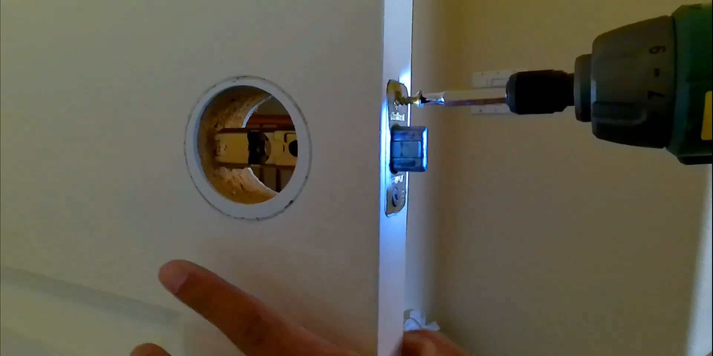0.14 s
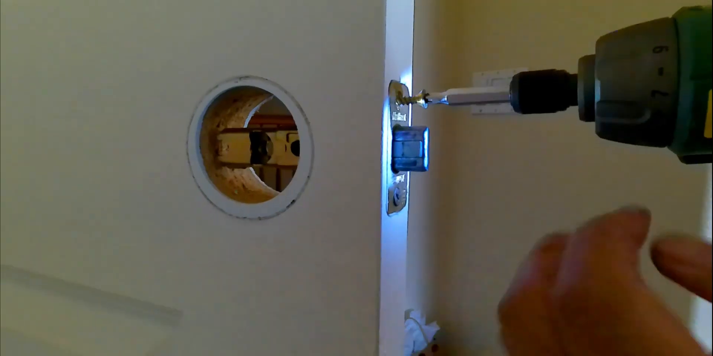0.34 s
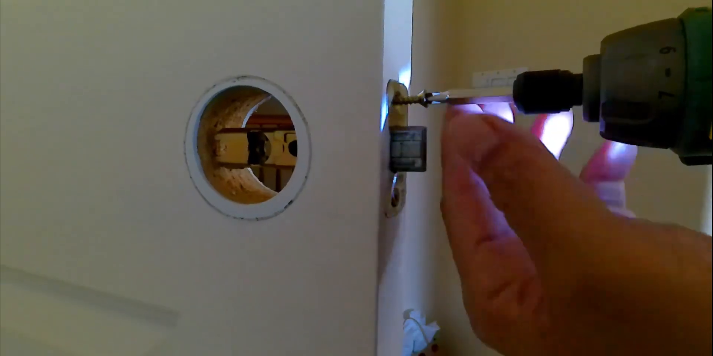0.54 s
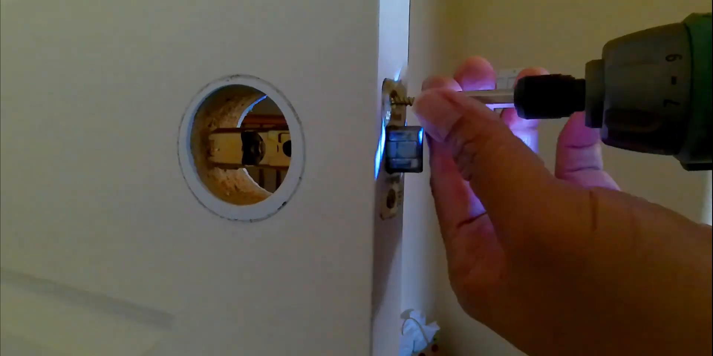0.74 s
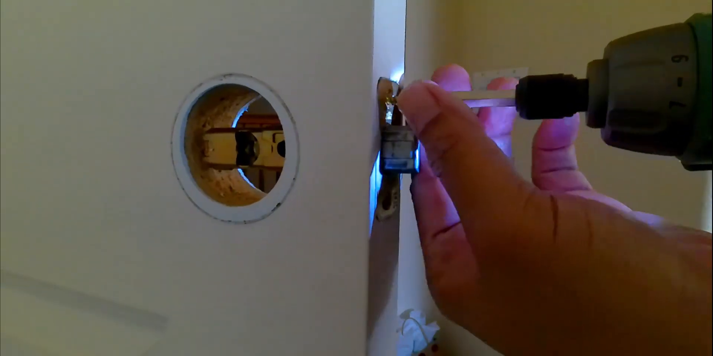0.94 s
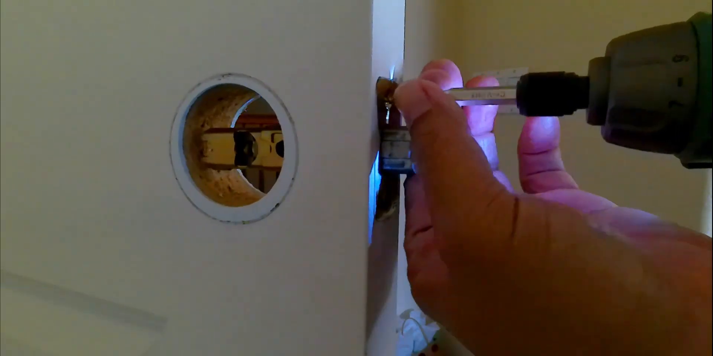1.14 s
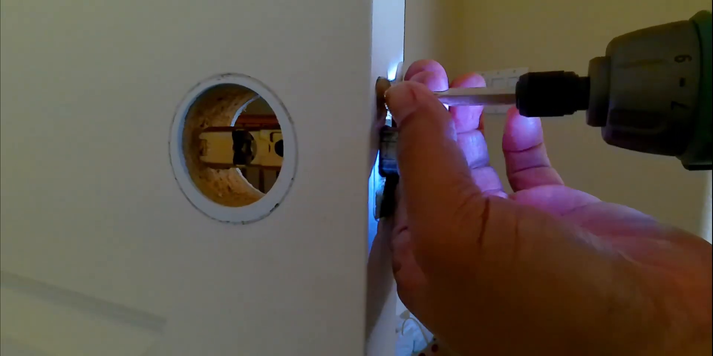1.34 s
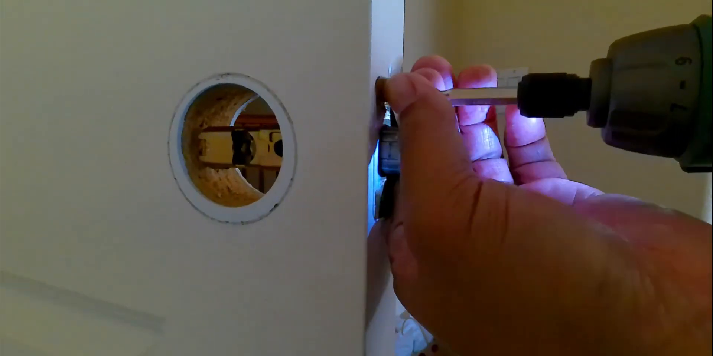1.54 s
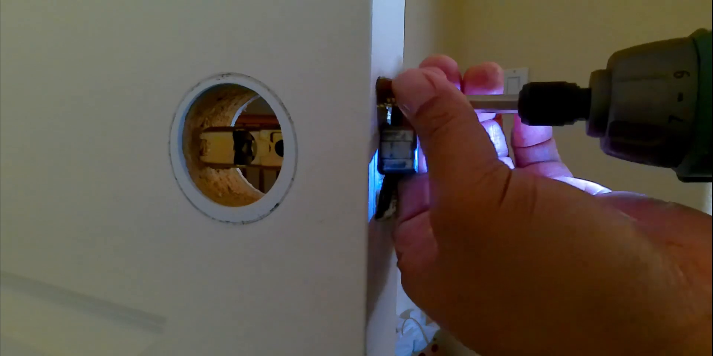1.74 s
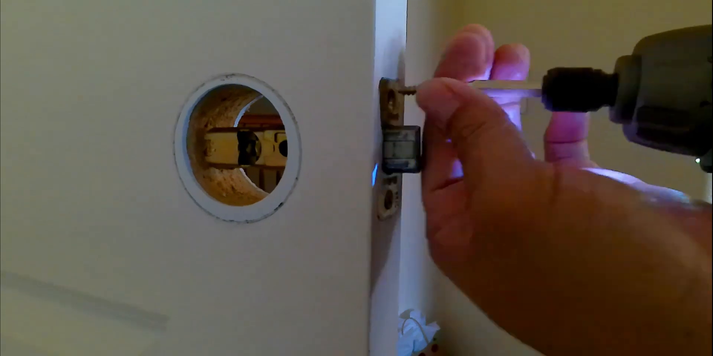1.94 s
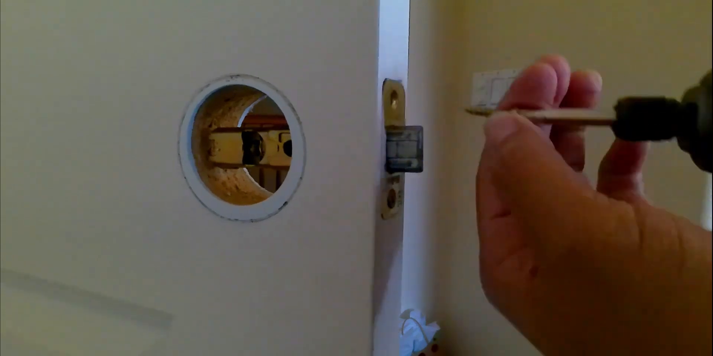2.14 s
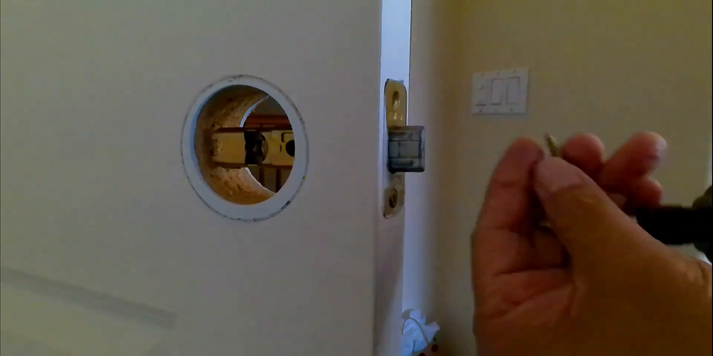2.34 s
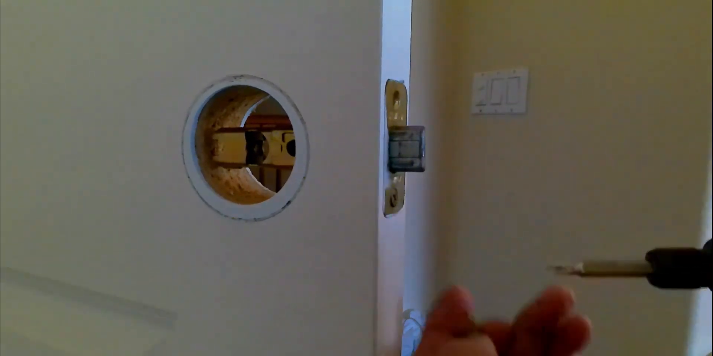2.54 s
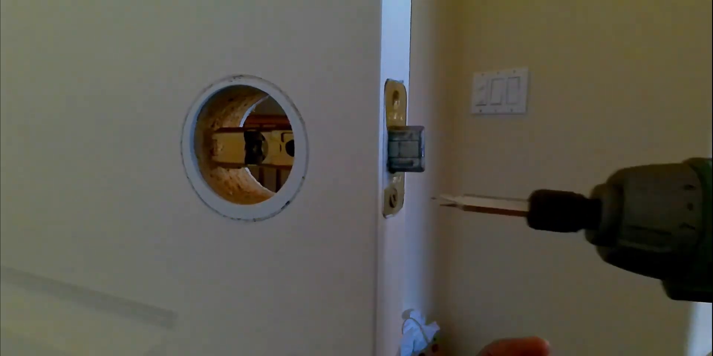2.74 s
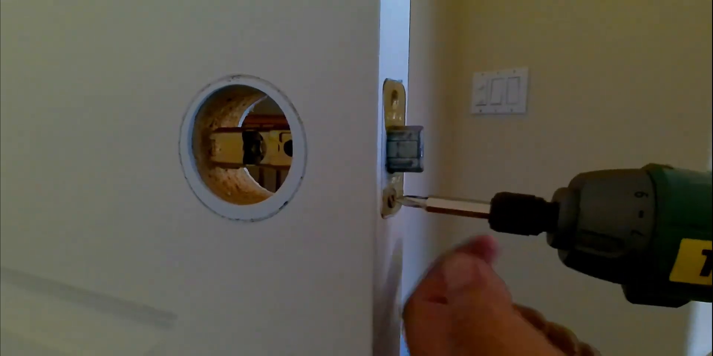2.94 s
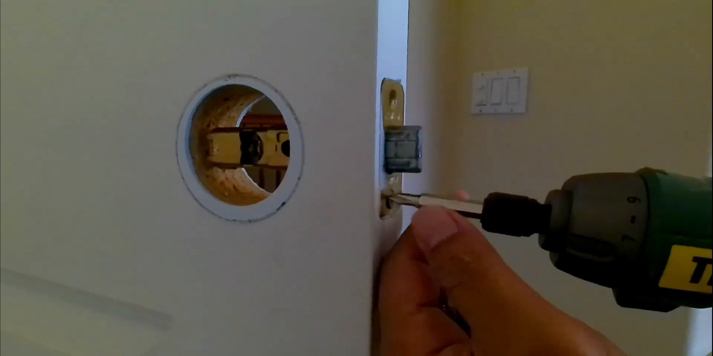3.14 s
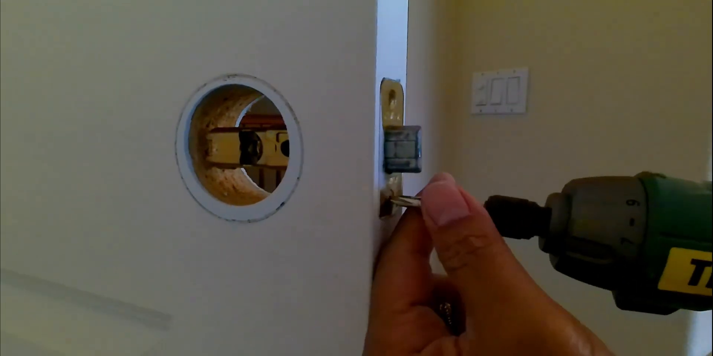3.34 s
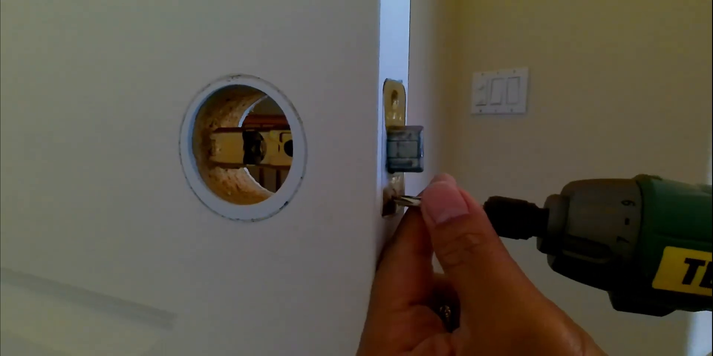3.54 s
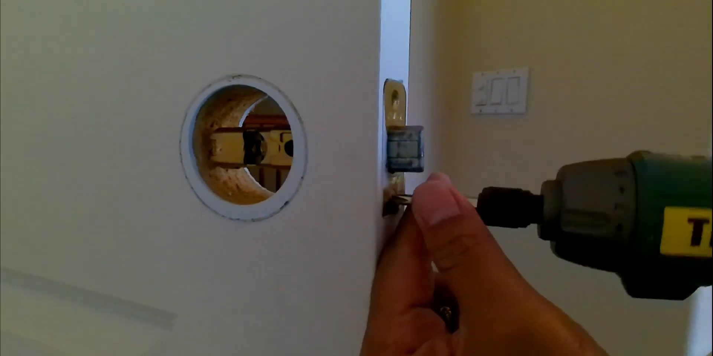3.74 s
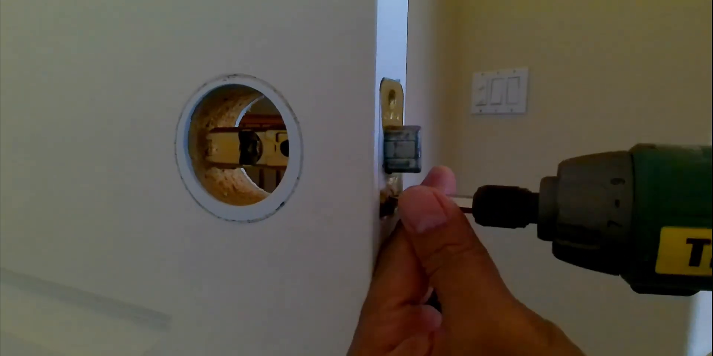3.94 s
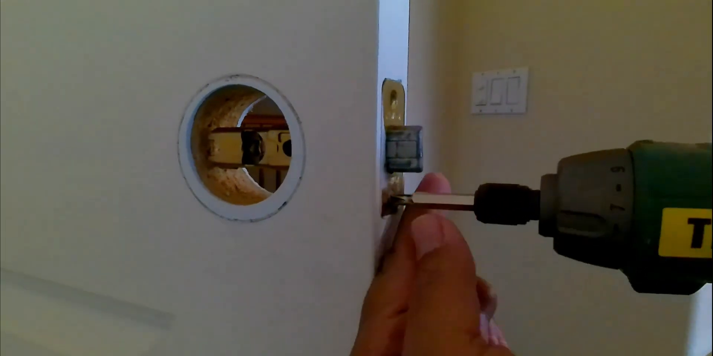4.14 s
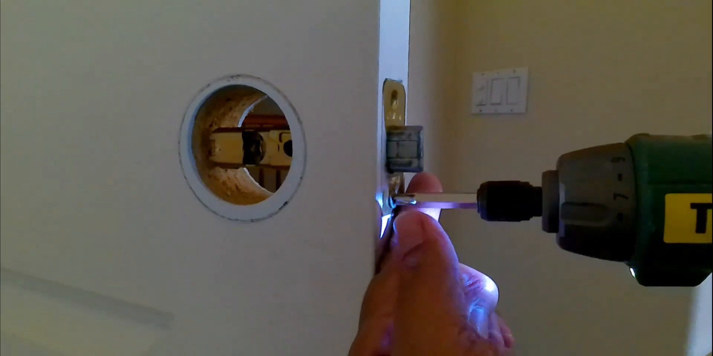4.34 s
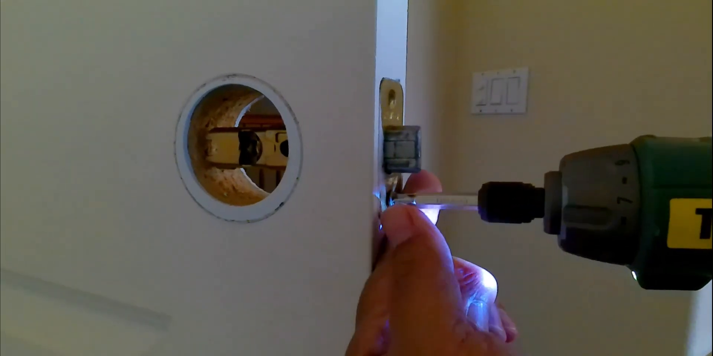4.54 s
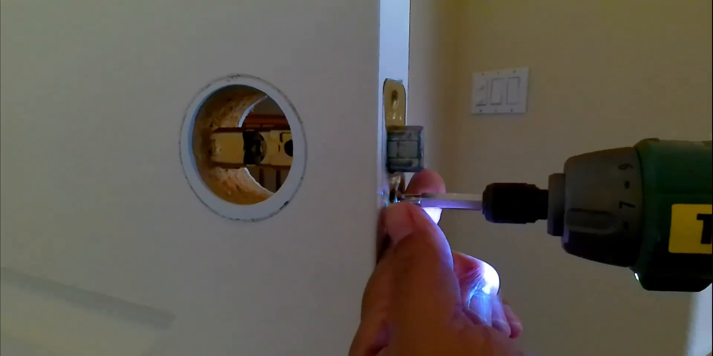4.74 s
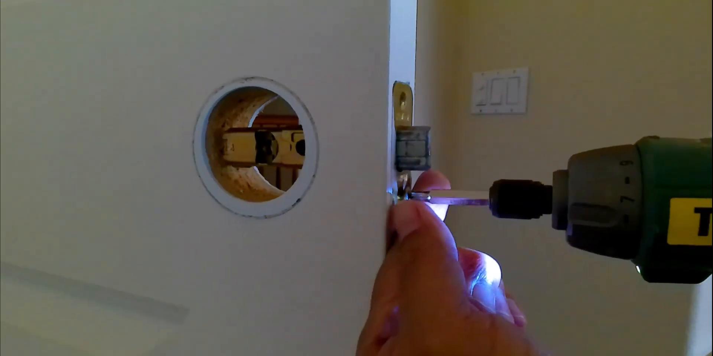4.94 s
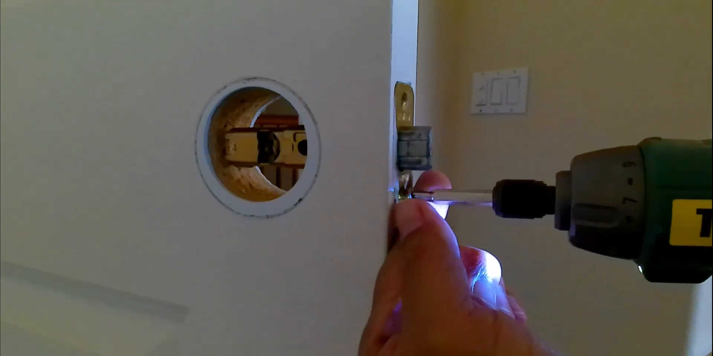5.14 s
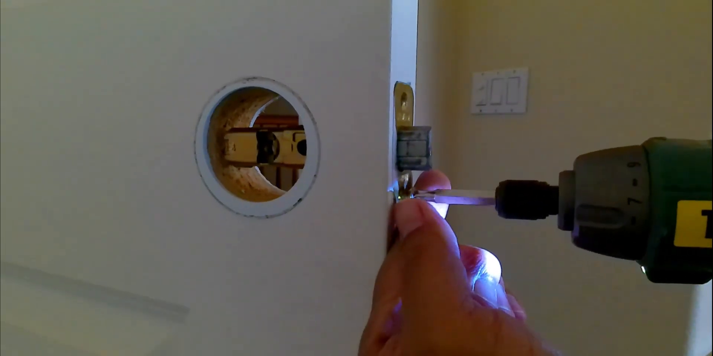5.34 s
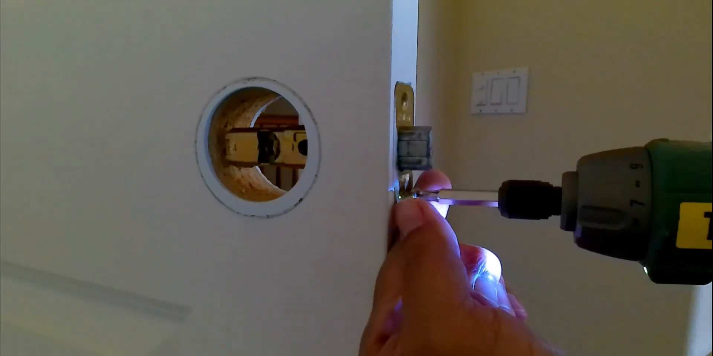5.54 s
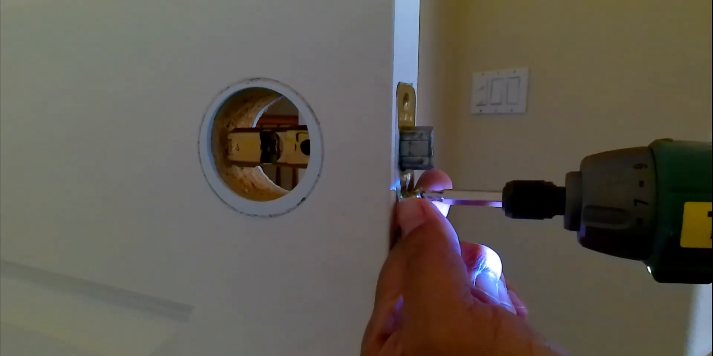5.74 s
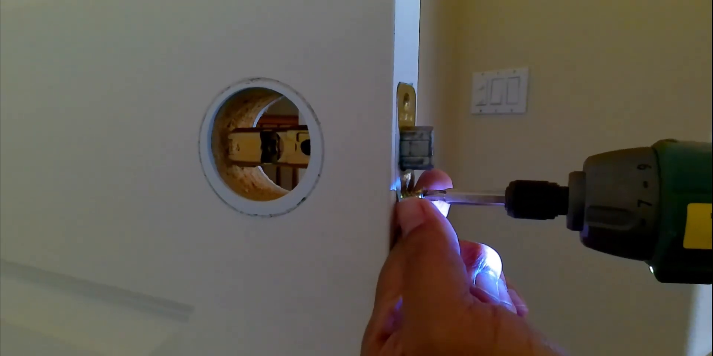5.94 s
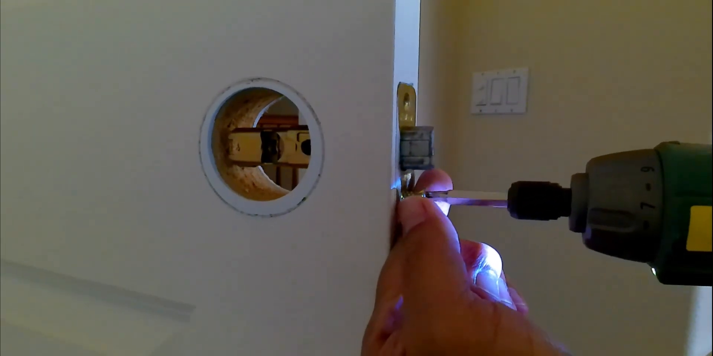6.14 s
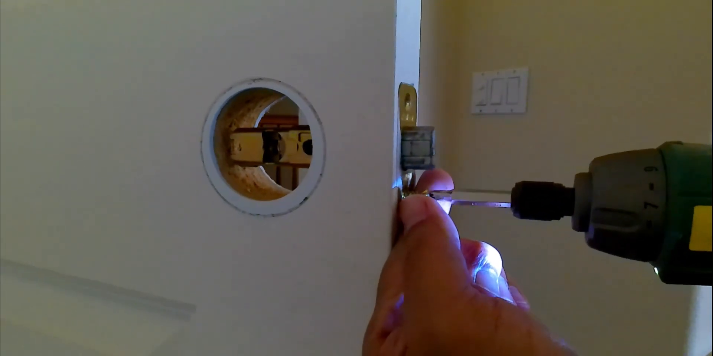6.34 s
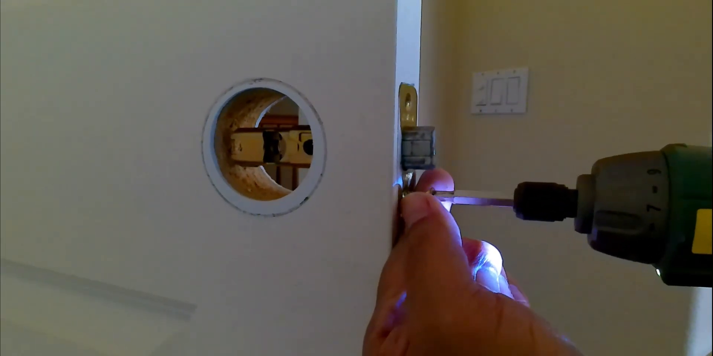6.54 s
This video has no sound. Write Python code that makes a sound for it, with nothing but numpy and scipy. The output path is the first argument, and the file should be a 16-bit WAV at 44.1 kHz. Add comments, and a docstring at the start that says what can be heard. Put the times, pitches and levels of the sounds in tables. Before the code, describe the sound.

A cordless drill-driver is heard close up in a small room with a short reverberation. From 0 seconds it is already at full speed: a dense, gritty whir of rattling gears, bright metallic chatter, airy fan noise and a thin whine, nearly steady in pitch and easing slightly in level. At about 2.0 it is released; the whir slides down in pitch and softens, stopping by 2.5 with a slight catch near the end. Quiet room tone and soft hiss follow. A faint tick comes near 2.95, then a clearer click and woody bump at 3.05, with small taps and ticks around 3.25, 3.5, 3.6, 3.8 and 3.9. At about 4.2 a trigger clack and quick, jolting judder launch the drill again. It starts a little lower and rougher under load, rises slightly until about 5.3, then runs steadily to an abrupt end around 6.7.

```python
"""Drill-driver at a door edge

A cordless drill-driver backs two screws out of a door edge, close to the microphone in a small room.
Gear-tooth blows and brush scratch ring its case and steel parts; whine lines follow the shaft speed.
Already running, it is let go and coasts to a stop; in the pause filtered noise bursts knock and tick.
Then it starts again with a jolt and judder and runs to the end, over shaped noise for air and hiss."""
import sys
import numpy as np
from scipy import signal
from scipy.fft import rfft, irfft, next_fast_len
from scipy.io import wavfile
from scipy.ndimage import uniform_filter1d, map_coordinates

SR = 44100
rng = np.random.default_rng(int(sys.argv[2]) if len(sys.argv) > 2 else 0)


def materialize(psi):
    """Save the field psi as 16-bit PCM at rate SR to the path in sys.argv[1].

    A 1-D psi becomes a single channel; in a 2-D psi each row is a channel.
    """
    bounded = np.clip(np.atleast_2d(psi).T, -1, 1)
    quanta = np.round(bounded * 32767).astype(np.int16)
    wavfile.write(sys.argv[1], SR, quanta)


N = 294588

# multiples of the planet rate: tooth mesh, mesh less one motor turn, motor shaft
TEETH, SIDEBAND, GEARING = 16, 13, 3
# a tight screw drags the speed down: free planet turns per s, and the scale of the sag that loads the drill
FREE_RATE, LOAD_SAG = 76.6, 1.3
LOAD_RATTLE_DB, LOAD_CHATTER_DB = 1.8, 1.5  # added to rattle and metallic chatter as load nears full
COAST_RATTLE_DB, COAST_CHATTER_DB = -9.5, -22  # change towards standstill; chatter also during spin-up
UNPOWERED_DB, CUT_S = -0.5, 0.02  # rattle and whine drop over this time when the trigger is let go
SPIN_UP_S, SETTLE_S = 0.027, 0.072  # time constant of spin-up; the last teeth come to rest

# speed under power, one curve per screw, before a slight random drift: t/s, planet gear turns per s
SPEED = [
    [(0, 75.65), (.2, 75.9), (.42, 76.3), (.54, 76.15), (.68, 76.7), (1.1, 76.45), (1.4, 76.7),
     (1.72, 76.5), (2.04, 76.7)],
    [(4.33, 71), (4.39, 72.3), (4.46, 73), (4.76, 74.6), (5.02, 75.72), (5.36, 76.45), (5.5, 76.2),
     (5.66, 76.5), (5.85, 76.4), (6.3, 76.72)],
]
# the gearbox lurches as the bit bites or slips, or as slowing teeth part and catch: t/s, level/dB, width/s
LURCHES = [(1.36, -3, .02), (2.30, 2.5, 0.022), (2.413, -8, 0.0084), (4.277, 5.5, .022), (4.45, 2, .03),
           (5.17, -1, .05), (5.42, 1.5, .035)]
# spectrum of the plastic gear case: f/Hz, relative level/dB per Hz on the first screw, on the second
CASE = [(90, -21, -34), (162, -28.5, -21.5), (410, -14, -11), (595, -14.5, -13.5), (840, -11, -10.5),
        (1014, -4, -4.5), (1200, -3, 1), (1630, -2, -5), (2010, -2.5, -2.5), (2270, -6.5, -8),
        (2680, -3, -4), (3106, -16, -17.5), (3380, -15, -15.5), (5700, -70, -68)]
# spectrum of the steel gears and chuck: f/Hz, relative level/dB per Hz on the first screw, on the second
STEEL = [(2020, -48.5, -27), (3090, -28, -13.5), (3710, -6, -5.5), (3940, -9, -10), (4180, -1, 1.5),
         (4560, -3, -4), (4830, 3, -1), (5320, -1.5, 2), (5830, -8.5, -6), (7370, -17, -19),
         (8230, -11.5, -11), (10800, -21.5, -18.5), (12000, -35, -28), (15000, -39, -45)]
# spectrum of cooling air in the vents: f/Hz, relative level/dB per Hz
FAN = [(300, -30), (3000, -32), (6000, 8), (7200, -7.5), (8300, -3.5), (10500, -8), (12000, -12.5),
       (15000, -12)]


def drill(screw, start, release, stop, rattle_db, chatter_db, fan_db, whine_db, ease_db_per_s):
    """One pull of the trigger: spin-up, noise easing as the screw backs out, coasting down on friction."""
    t = clock()
    running = np.maximum(t - start, 0)
    speed, = curves(SPEED[screw])
    load = np.tanh(np.maximum(FREE_RATE - speed, 0) / LOAD_SAG)
    coast = np.clip((stop - t) / (stop - release), 0, 1)
    spin = coast * (1 - np.exp(-running / SPIN_UP_S))
    turns = np.cumsum(speed * spin * (1 + 0.0005 * wobble(14))) / SR
    moving = np.clip(running / 0.006, 0, 1) * np.clip((stop - t) / SETTLE_S, 0, 1)
    unpowered = np.clip((t - release) / CUT_S, 0, 1)

    # the bit wanders in the screw head, so the noise comes and goes a little
    lurch_db = sum(db * np.exp(-((t - s) / width) ** 2) for s, db, width in LURCHES)
    effort_db = lurch_db - ease_db_per_s * running + 0.4 * wobble(10)
    slowing_db = UNPOWERED_DB * unpowered + COAST_RATTLE_DB * (1 - coast)
    rattle = amp(effort_db + LOAD_RATTLE_DB * load + slowing_db + 0.97 * wobble(30))
    chatter_change_db = LOAD_CHATTER_DB * load + COAST_CHATTER_DB * (1 - spin)
    chatter = amp(effort_db + chatter_change_db + 0.6 * wobble(22))

    def level(x):
        """Scale to rms 1 over the time the motor turns faster than half speed."""
        return x / np.sqrt(np.mean(x[spin > 0.5] ** 2))

    case_body = [(row[0], row[1 + screw]) for row in CASE]
    steel_body = [(row[0], row[1 + screw]) for row in STEEL]
    case_hits = tooth_hits(turns, scatter_db=3, throb_db=3.0, slide=0.52)
    case = ringing(case_hits + 0.042 * brushes(turns), case_body)
    steel_hits = tooth_hits(turns, scatter_db=4.5, throb_db=2.5, slide=0.7)
    steel = ringing(steel_hits + 0.38 * brushes(turns), steel_body)
    # slow, slack teeth strike softly and ring the case mainly around one mode
    slack = filtered(case, lambda f: resonance(f, hz=1290, width=420))
    case = coast * level(case) + (1 - coast) * level(slack)

    gears = amp(rattle_db) * rattle * case + amp(chatter_db) * chatter * level(steel)
    fan = amp(fan_db) * chatter * spin * ringing(rng.standard_normal(N), FAN)
    tones = whine(screw, speed, spin, turns, load, case_body, steel_body)
    # the thin whine fades as the gears slow
    thin_whine = amp(whine_db + UNPOWERED_DB * unpowered) * spin ** 2.2 * tones
    return moving * (room(gears, wet_db=-7.5) + fan + thin_whine)


def tooth_hits(turns, scatter_db, throb_db, slide):
    """A blow per gear tooth, harder once a motor turn and as the planets pass; sliding noise between."""
    def beat(multiple):
        """A cosine at a multiple of the planet rate, from a random phase."""
        return np.cos(2 * np.pi * (multiple * turns + rng.random()))

    throb = beat(GEARING) + 0.9 * beat(TEETH / 9) + 0.6 * beat(2)
    throb = throb + 0.4 * beat(2 * TEETH / 9) + 0.4 * beat(1)
    at = np.flatnonzero(np.diff(np.floor(TEETH * turns + 0.12 * wobble(900))))
    scatter = amp(scatter_db * np.clip(rng.standard_normal(len(at)), -2, 2))
    blows = np.zeros(N)
    blows[at] = rng.choice([-1, 1], len(at)) * scatter
    # even out the power, however fast the teeth follow one another
    blows /= np.sqrt(np.abs(uniform_filter1d(blows ** 2, SR // 10)) + 1e-4)
    return amp(throb_db * throb) * (blows + slide * rng.standard_normal(N))


def brushes(turns, size=192):
    """The brushes scratch over the same worn commutator on every motor turn."""
    place = (GEARING * turns + 0.012 * wobble(60)) * size
    return unit(map_coordinates(rng.standard_normal(size), [place % size], mode="grid-wrap"))


# whine of gears and motor: multiple of the planet rate (rounded when played),
# relative level/dB on the first screw, on the second, level/dB gained towards full load
WHINE = [(3, -59, -54.5, 7), (6, -64.5, -63, 10.5), (9, -60.5, -47, 0.5), (10, -66, -65.5, 13),
         (11, -61.5, -57, 3), (12, -49, -52.5, 5.5), (15, -46.5, -52, 5), (17, -75, -60, 2),
         (18, -65, -55, -11), (19, -46.5, -46, 1), (20, -54, -73, -12), (22, -47.5, -51, -1),
         (23, -49.5, -54, -11), (26, -50.5, -51, -11), (27, -46, -46.5, -4), (29, -49, -50, -19),
         (32, -50.5, -56, 3), (35, -59, -60.5, 7.5), (36, -53.5, -58, -13), (45, -60.5, -56.5, 3),
         (48, -55, -50, -15), (51, -59, -60, -15), (54, -56, -55, -15), (64.1, -50, -54, 4),
         (67.1, -61, -55, 4), (86, -79, -63, 11), (124, -78, -60.5, -5)]
# gear mesh tone, swelling and dropping out as the speed creeps up, one curve per screw:
# t/s, relative level/dB
MESH_LEVEL = [
    [(0, -40.5), (.6, -38), (.9, -43), (1.8, -44.5), (2.04, -45)],
    [(4.33, -36), (4.42, -35), (4.57, -34), (4.65, -63), (4.75, -50), (4.86, -33.5), (4.95, -41),
     (5.5, -43.5), (6.3, -38.5)],
]
# lower sideband of the mesh tone, one curve per screw: t/s, relative level/dB
SIDEBAND_LEVEL = [
    [(0, -45), (.65, -42), (1.15, -49.5), (2.04, -53)],
    [(4.36, -38.5), (4.5, -49), (4.86, -48.5), (5.3, -41), (6.68, -42)],
]


def whine(screw, speed, spin, turns, load, case, steel, mesh_gain_db=0.47, ring_db=10):
    """Gear mesh tone, its sideband and multiples of the planet rate; load shifts their balance."""
    mesh_db, = curves(MESH_LEVEL[screw])
    sideband_db, = curves(SIDEBAND_LEVEL[screw])
    rates = np.linspace(0, np.max(speed), 300)

    def line(multiple, waver_db, blur):
        """A gliding line swells and fades as it crosses the drill's resonances, one of them sharp."""
        f = round(multiple) * rates
        sharp_db = ring_db * np.abs(resonance(f, hz=2550, width=180)) ** 2
        colour_db = np.maximum(along(case, f), along(steel, f)) + sharp_db
        swell = amp(np.clip(colour_db - colour_db[-1], -20, 9))  # relative to the highest speed
        return np.interp(speed * spin, rates, swell) * tone(turns, round(multiple), waver_db, blur)

    partials = sum(amp(db[screw] + load_db * load) * line(multiple, waver_db=1.68, blur=0.1)
                   for multiple, *db, load_db in WHINE)
    mesh = sum(amp(db) * line(multiple, waver_db=1.5, blur=0.12)
               for multiple, db in [(TEETH, mesh_db), (SIDEBAND, sideband_db)])
    return partials + amp(mesh_gain_db) * mesh


def tone(turns, multiple, waver_db, blur):
    """One sine line of the whine; play in the gears unsettles its level and phase (blur in radians)."""
    phase = 2 * np.pi * (multiple * turns + rng.random()) + blur * wobble(25)
    return np.sqrt(2) * amp(waver_db * wobble(9)) * np.sin(phase)


# the second screw breaks loose and the bit judders in its head: f/Hz, width/Hz, relative level/dB
JUDDER = [(988, 160, -32.5), (1280, 240, -40), (1850, 210, -34), (4250, 1000, -36), (5270, 1500, -32)]


def judder(start=4.236, peak=4.275, length=0.029):
    """Once the motor grips, a quick swell of stick and slip rings the screw, bit and latch plate."""
    t = start + np.arange(SR // 4) / SR
    swell = np.exp(-np.abs(t - peak) / length) * np.clip((t - start) / 0.014, 0, 1)
    ring = np.zeros(len(t))
    for hz, width, db in JUDDER:
        noise = rng.standard_normal(len(t))
        ring += amp(db) * unit(filtered(noise, lambda f: resonance(f, hz, width) ** 2))
    out = np.zeros(N)
    out[round(start * SR):][:len(t)] = swell * ring
    return out


# the bit bumps the screw and the door answers: t/s, level/dB over the first 20 ms,
# pitch of the blow f/Hz, decay time constant of the contact/s
KNOCKS = [(3.043, -40.5, 1230, 0.0043), (3.050, -43.5, 670, 0.014), (3.062, -42.5, 225, 0.032),
          (3.27, -54, 704, 0.032), (3.48, -49, 920, 0.021), (3.625, -46, 720, 0.01),
          (3.773, -54.5, 850, 0.0083), (3.919, -47, 705, 0.0081), (3.928, -44.5, 570, 0.0091),
          (4.143, -55.5, 1300, .02), (4.272, -39, 100, 0.051)]
# modes of the door: f/Hz, width/Hz, mean relative level/dB
DOOR = [(222, 99, -3), (360, 140, 2.5), (462, 92, 4), (591, 36, 4), (776, 110, -4), (950, 300, -21),
        (1200, 150, -10), (1430, 280, -10), (1920, 230, -26)]


def knocks():
    """The bit rubs briefly as it lands; each blow rings the modes of the door at new strengths."""
    out, t = np.zeros(N + SR), np.arange(SR // 4) / SR
    for s, db, hz, contact in KNOCKS:
        modes = [(c, width, amp(level + rng.normal(0, 2.2)) * rng.choice([-1, 1]))
                 for c, width, level in DOOR]

        def struck_wood(f):
            """The door's modes, favoured near the pitch of the blow."""
            wood = sum(gain * resonance(f, c, width) for c, width, gain in modes)
            return wood * resonance(f, hz, 0.38 * hz)

        push = rng.standard_normal(len(t)) * np.exp(-t / contact)
        ring = filtered(push, struck_wood)
        out[round(s * SR):][:len(t)] += amp(db) * ring / np.std(ring[:SR // 50])
    return out[:N]


PING_HZ = 4200  # the steel bit and chuck
# small hard contacts of gears, bit, screw and trigger, levels over the first 5 ms:
# t/s, steel ping level/dB, body clack level/dB, clack pitch f/Hz, t60/s of the exciting noise
TICKS = [(2.425, -50, -58, 1400, .045), (2.952, -63, -58, 1500, .04), (3.040, -46, -46, 1740, 0.033),
         (3.225, -65, -46, 1910, 0.016), (3.467, -62, -53, 1800, .018), (3.477, -46.5, -51, 1640, 0.056),
         (3.622, -60, -67, 1700, .04), (3.770, -64, -72, 1700, .03), (3.916, -60, -60, 1700, .04),
         (3.963, -55.5, -52.5, 1770, 0.056), (4.215, -59, -49, 1240, .026), (4.235, -45, -35, 1190, .04)]


def ticks():
    """Hard little contacts: a crack that pings the steel, clacks in the body behind it and dies at once."""
    out, t = np.zeros(N + SR), np.arange(SR // 8) / SR
    for s, ping_db, clack_db, clack_hz, t60 in TICKS:
        for db, hz in [(ping_db, PING_HZ), (clack_db, clack_hz)]:
            burst = rng.standard_normal(len(t)) * amp(-60 * t / t60)
            crack = filtered(burst, lambda f: resonance(f, hz, 0.97 * hz) ** 4)
            out[round(s * SR):][:len(t)] += amp(db) * crack / np.std(crack[:SR // 200])
    return out[:N]


# decay of the small room: f/Hz, t60/s
ROOM = [(200, 0.29), (1500, 0.15), (10000, 0.18)]


def room(x, wet_db):
    """x plus the short tail of a small room: noise dying at its own rate in each band."""
    hz, t, z = signal.stft(rng.standard_normal(SR // 2), SR, nperseg=256)
    decay = amp(-60 * t / along(ROOM, hz)[:, None])
    tail = signal.istft(z * decay, SR, nperseg=256)[1]
    delayed = np.pad(tail / np.linalg.norm(tail), (SR // 300, 0))
    return x + amp(wet_db) * signal.fftconvolve(x, delayed)[:N]


# spectrum of room tone and microphone hiss: f/Hz, relative level/dB per Hz
AIR = [(8, -45), (20, -17), (30, -3), (50, -5), (90, -4.5), (135, -10), (250, -10.5), (420, -17),
       (700, -20.5), (1600, -27), (3200, -34), (6500, -36.5), (15000, -39)]


def air(level_db=-52.5):
    """Room tone and microphone hiss: steady noise of one fixed spectrum."""
    return amp(level_db) * ringing(rng.standard_normal(N), AIR)


def amp(db):
    """Decibels to gain."""
    return 10 ** (np.asarray(db) / 20)


def unit(x):
    """Scale to rms 1."""
    return x / np.sqrt(np.mean(x ** 2) + 1e-20)


def clock():
    """The time of every sample in seconds."""
    return np.arange(N) / SR


def along(points, hz):
    """Interpolate (Hz, value) points on a log frequency axis."""
    f, v = np.transpose(points)[:2]
    return np.interp(np.log(hz + 1), np.log(f + 1), v)


def curves(rows):
    """One value per sample for each column after the time."""
    s, *cols = np.transpose(rows)
    return [np.interp(clock(), s, c) for c in cols]


def wobble(rate):
    """A smooth random curve, rate knots a second."""
    knots = rng.standard_normal(int(N * rate / SR) + 4)
    coarse = np.arange(0, N, 32)
    return np.interp(np.arange(N), coarse, map_coordinates(knots, [coarse * rate / SR]))


def filtered(x, response):
    """x through a complex response of frequency."""
    m = next_fast_len(len(x) + SR // 4)
    return irfft(rfft(x, m) * response(np.fft.rfftfreq(m, 1 / SR)), m)[:len(x)]


def resonance(f, hz, width):
    """Causal response of one mode, 1 at its peak."""
    return 1j * f * width / (hz * hz - f * f + 1j * f * width)


def ringing(x, spectrum, size=4096):
    """x through a causal (minimum-phase) body with the given spectrum, at rms 1."""
    hz = np.fft.rfftfreq(size, 1 / SR)
    cepstrum = irfft(np.log(amp(along(spectrum, hz)) + 1e-6))
    # folding the cepstrum puts the ring after the blow
    cepstrum[1:size // 2] *= 2
    cepstrum[size // 2 + 1:] = 0
    return unit(signal.fftconvolve(x, irfft(np.exp(rfft(cepstrum))))[:N])


def scene():
    """Two screws, the handling between them, and the quiet room."""
    first = drill(0, start=-0.51, release=2.04, stop=2.54, rattle_db=-36.0, chatter_db=-36.0,
                  fan_db=-45.0, whine_db=-1.0, ease_db_per_s=0.91)
    # the second release lies beyond the end, so the drill is still running there
    second = drill(1, start=4.235, release=7, stop=8, rattle_db=-38.0, chatter_db=-38.5,
                   fan_db=-47, whine_db=-1.0, ease_db_per_s=0.02)
    contacts = knocks() + ticks() + amp(2.5) * judder()
    return (first + second + room(contacts, wet_db=-5.5) + air())[None]


def record(dry, top_hz=14950):
    """The camera's microphone channel keeps nothing above its band limit."""
    return filtered(dry[0], lambda hz: hz < top_hz)[None]


dry = scene()
out = record(dry)
materialize(out)
```